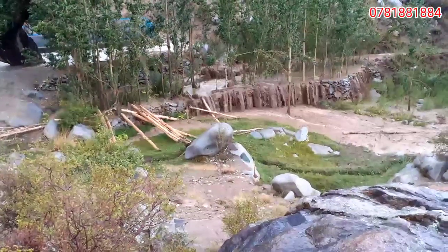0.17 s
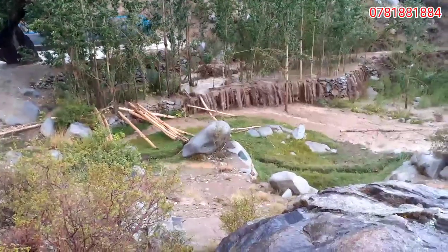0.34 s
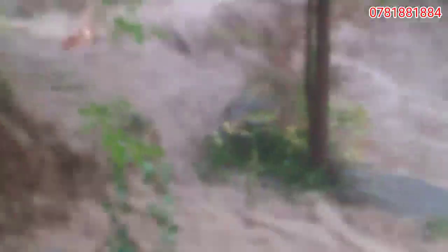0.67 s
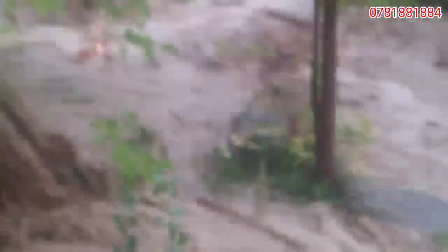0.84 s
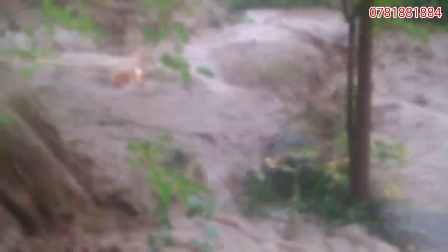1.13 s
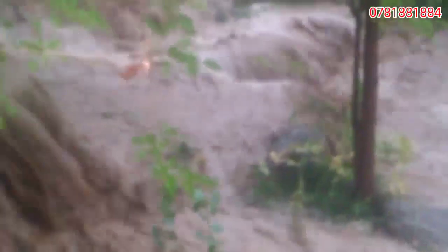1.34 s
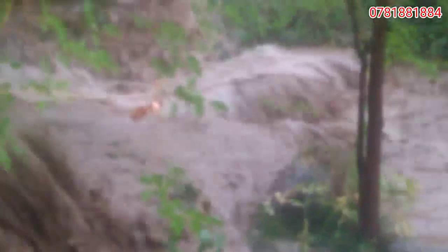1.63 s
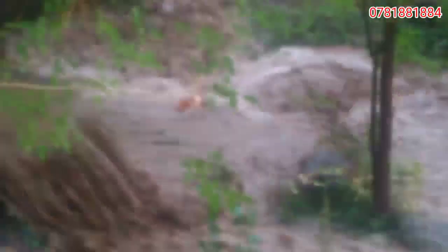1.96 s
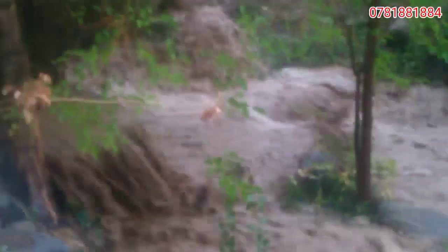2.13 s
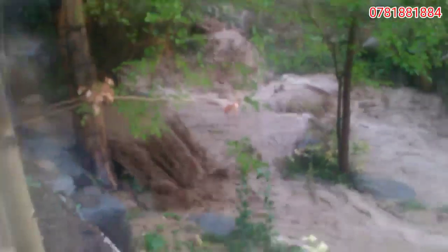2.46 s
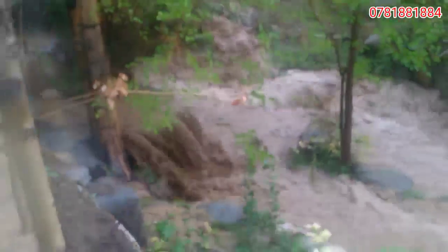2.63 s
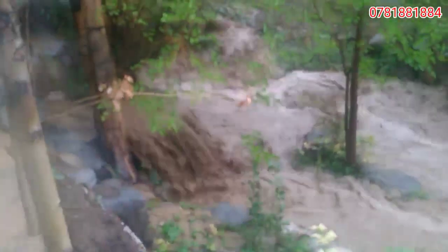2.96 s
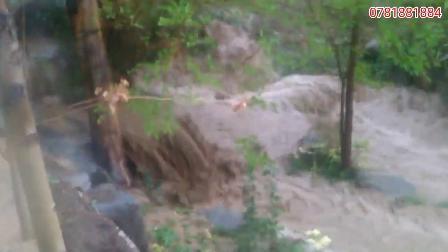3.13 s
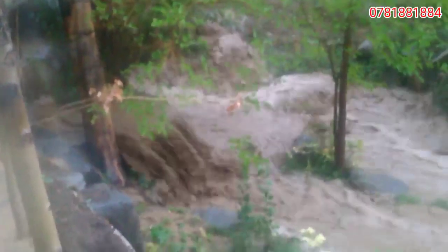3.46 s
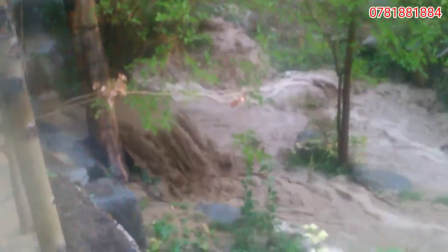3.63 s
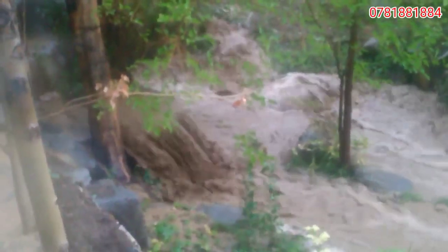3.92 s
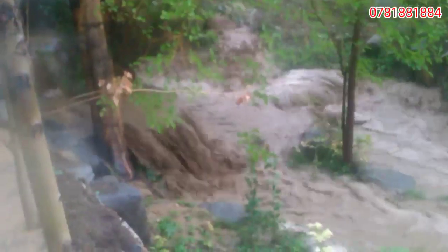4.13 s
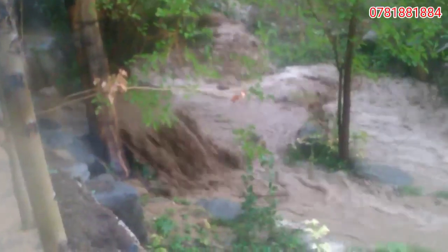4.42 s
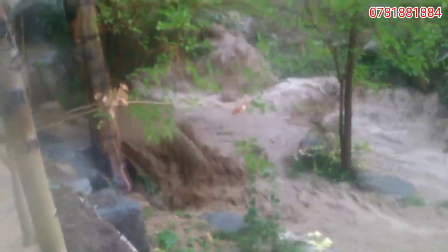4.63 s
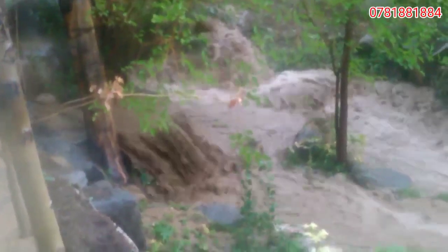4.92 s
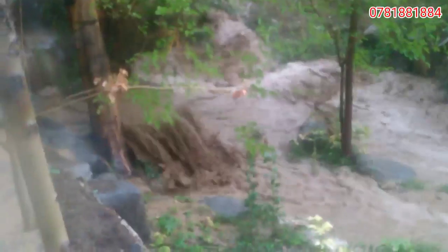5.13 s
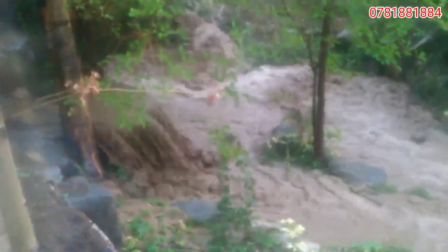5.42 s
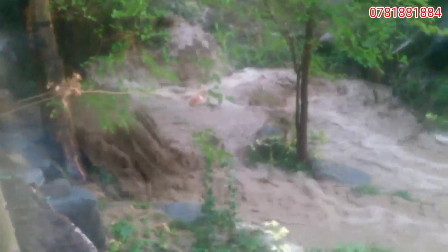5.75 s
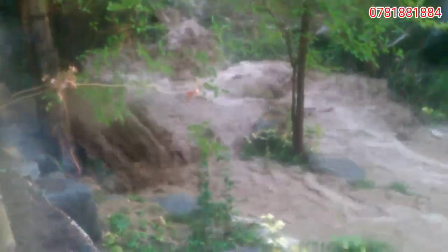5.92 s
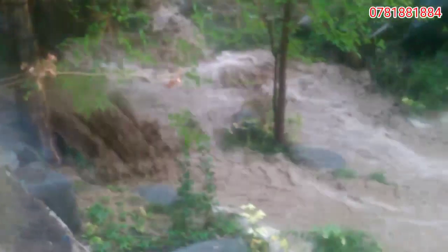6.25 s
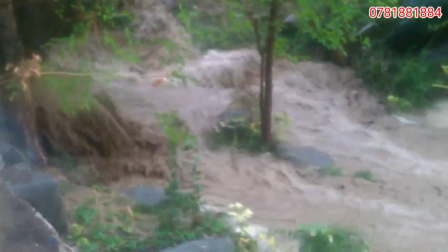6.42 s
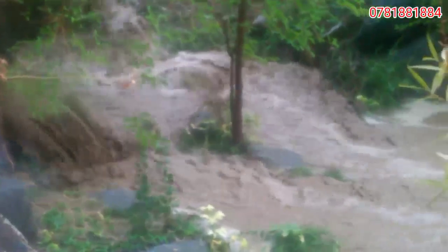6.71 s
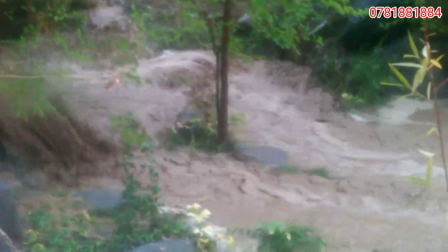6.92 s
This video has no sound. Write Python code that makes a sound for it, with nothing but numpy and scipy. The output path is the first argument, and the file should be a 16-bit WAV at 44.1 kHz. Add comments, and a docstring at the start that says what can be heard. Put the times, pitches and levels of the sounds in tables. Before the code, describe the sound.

Outdoors, a brief, distant rush of floodwater spreads wide in stereo, dotted with hard stony knocks, then cuts to silence. A single microphone on the stream bank picks up a loud, dense roar of water and a high hiss of spray. About a second later the roar falls away, leaving water churning and splashing over boulders with a low, uneven rumble and occasional gulps of air. The hiss thins near the end.

```python
"""Muddy floodwater after heavy rain

From a hillside, in wide stereo: a distant rush and a few sharp knocks, likely stones carried by the flood.
Half a second of silence, then one microphone close on the bank: countless splashes merge into a loud,
even roar under a bright hiss of spray. The roar falls away to leave waves tumbling over boulders,
with a deep rumble and lumpy churning. Pockets of trapped air ring as gurgles."""
import sys
import numpy as np
from scipy import signal
from scipy.fft import rfft, irfft
from scipy.io import wavfile

SR = 44100
rng = np.random.default_rng(int(sys.argv[2]) if len(sys.argv) > 2 else 0)


def output_pcm(signal):
    """Save a mono or channel-first signal as 16-bit PCM at the path in sys.argv[1].

    Samples are clipped to [-1, 1] before scaling.
    """
    pcm = np.clip(np.atleast_2d(signal).T, -1, 1) * 32767
    wavfile.write(sys.argv[1], SR, np.round(pcm).astype(np.int16))


N = 312228
TIME = np.arange(N) / SR
FREQ = np.maximum(np.arange(N // 2 + 1) * SR / N, 1)
HILLSIDE_END_S, BANK_START_S = .498, 1.076

# spectrum of the flood from the hillside (frequency [Hz], relative level [dB])
RUSH_SPECTRUM = [(18, -75), (30, -31), (108, -6.5), (152, -8.5), (202, -10.5), (332, -7.5), (378, -7.5),
                 (466, -13), (746, -11.5), (807, -13), (2070, -21.5), (3310, -21.5), (6870, -24),
                 (8700, -26.5), (15400, -30.5)]
# how alike the rush is at the left and right microphones (frequency [Hz], coherence [0-1])
RUSH_COHERENCE = [(60, .9), (290, 1), (640, .7), (1400, .17), (3100, .02)]
# distant stones (time [s], level [dB], pitch [Hz], left lag behind right [ms], tick re knock [dB])
KNOCKS = [(.0160, -12, 1300, 0, -11), (0.03, -14, 790, 0, -29.5), (0.066, -3, 720, 0, -21),
          (0.0835, -4.5, 1200, 0.11, -8), (0.0964, -19.5, 1100, 0, -20), (.1292, -16, 950, 0.022, -16),
          (0.1554, -5.5, 760, .14, -21.5), (.1572, -3.5, 900, 0.29, -19.5), (0.184, -5, 720, -.14, -26.5),
          (0.335, -9, 950, 0, -18), (0.4154, -16, 1300, 0, -6), (0.4692, -10.5, 950, 0, -15.5)]
# spectra of the main chute and its spray, from the bank (frequency [Hz], relative level [dB])
ROAR_SPECTRUM = [(15, -34), (25, -2.5), (76, 1), (124, -3), (204, -1.5), (359, -7.5), (454, -11), (728, -7),
                 (839, -6.5), (1110, -13.5), (1620, -9.5), (2370, -10), (3070, -16.5), (4800, -15.5),
                 (7000, -19.5), (9100, -45), (15400, -120)]
SPRAY_SPECTRUM = [(4800, -27), (5800, -9), (7000, -4.5), (8000, 1), (9000, 2), (10300, 2.5), (12000, 1),
                  (14300, -1)]
# the loudest gulps of air (time [s], pitch [Hz], peak level [dB])
LOUD_GURGLES = [(1.335, 860, -20), (3.794, 687, -27), (4.446, 697, -23.5), (4.708, 669, -22),
                (4.777, 562, -25), (5.005, 288, -19.5), (5.029, 777, -22), (5.215, 242, -18),
                (5.539, 684, -21.5), (5.928, 192, -19), (6.334, 713, -21.5), (7.009, 245, -19.5)]
# strength of the flow, which drives churn, splash and small gurgles (time [s], level [dB])
FLOW = [(2.7, -32), (4.1, -31), (4.37, -31), (4.42, -27.5), (5.15, -27), (7.05, -28)]
# rise and fall of the deep rumble (time [s], level [dB])
RUMBLE_LEVEL = [(3.3, -28.5), (3.7, -34.5), (4.35, -31), (4.45, -28), (5.15, -28), (5.55, -32),
                (5.88, -22.5), (6.15, -30), (6.65, -31.5), (7.0, -27.5)]
# spectra of the waves in the channel, from the bank (frequency [Hz], relative level [dB])
RUMBLE_SPECTRUM = [(8.8, -28), (15, 1), (38, -3.5), (70, 0), (150, -2.5), (200, -14.5), (330, -120)]
CHURN_SPECTRUM = [(88, -27), (150, 0.5), (247, 1), (297, -3.5), (360, -4.5), (458, -10), (695, -4.5),
                  (871, -5.5), (1100, -7.5), (1430, -46), (2420, -120)]
SPLASH_SPECTRUM = [(650, -18), (1100, -2), (2010, -0.5), (2310, -5), (2790, -4), (3180, -8.5), (4980, -9),
                   (7000, -5.5), (9100, -37), (15400, -120)]


def undb(db):
    """Decibels to gain."""
    return 10 ** (np.asarray(db) / 20)


def unit(x):
    """Scale to rms 1."""
    return x / np.sqrt(np.mean(x ** 2))


def add(out, s, sound):
    """Mix a sound in at time s."""
    start = int(s * SR)
    out[start:start + len(sound)] += sound[:max(len(out) - start, 0)]


def over_time(points):
    """Join (time [s], value) points by straight lines."""
    return np.interp(TIME, *np.transpose(points))


def over_freq(points):
    """Join (frequency [Hz], value) points on a log-frequency axis."""
    hz, value = np.transpose(points)
    return np.interp(np.log(FREQ), np.log(hz), value)


def colour(x, spectrum):
    """Filter by (frequency [Hz], level [dB]) points; rms 1."""
    return unit(irfft(rfft(x) * undb(over_freq(spectrum)), N))


def band(x, lo_hz, hi_hz, order=12):
    """Keep the band between two edges; rms 1."""
    power_loss = (1 + (lo_hz / FREQ) ** (2 * order)) * (1 + (FREQ / hi_hz) ** (2 * order))
    return unit(irfft(rfft(x) / np.sqrt(power_loss), N))


def wander(rate):
    """A random drift of rms 1 that takes `rate` new values a second."""
    knots = rng.standard_normal(size=2048)
    return unit(np.interp(TIME * rate, np.arange(len(knots)), knots))


def far_rush(gain_db=-27.5):
    """The flood from far off: bass alike at both microphones and leaning left, treble unrelated."""
    coherence = np.clip(over_freq(RUSH_COHERENCE), 0, .99)
    mid, side = (rfft(colour(rng.standard_normal(N), RUSH_SPECTRUM)) for _ in range(2))
    side *= np.sqrt((1 - coherence) / (1 + coherence))
    lean = undb(over_freq([(150, 1.4), (1300, 0.16)]))
    return irfft(np.array([(mid + side) * lean, (mid - side) / lean]), N) * undb(gain_db)


def stone_pulse(age, hz, ring_cycles=0.62, front_s=.0001):
    """A struck stone's surface moves and comes to rest; the air pressure follows its speed."""
    onset = 1 - np.exp(-age / front_s)
    return np.gradient(onset * np.sin(2 * np.pi * hz * age) * np.exp(-age * hz / ring_cycles))


def knocks(tick_s=.0013, echo_s=.0021, echo_db=-15, scatter_db=-23, scatter_s=.008):
    """Distant stones: each a steep pulse with a hard tick, a ground echo and scatter off the rocks."""
    out = np.zeros((2, N))
    age = np.arange(SR // 20) / SR
    scatter_band = signal.butter(2, [500, 2200], "band", fs=SR, output="sos")
    for s, db, hz, left_lag_ms, tick_db in KNOCKS:
        direct = stone_pulse(age, hz)
        echo = stone_pulse(np.maximum(age - echo_s, 0), hz)
        pulse = (direct + undb(echo_db) * echo) / direct.max()
        for mic, lag_ms in zip(out, (left_lag_ms, -left_lag_ms)):
            noise = rng.standard_normal(len(age))
            tick = undb(tick_db) * noise * np.exp(-age / tick_s)
            scatter = unit(signal.sosfilt(scatter_band, noise)) * np.exp(-age / scatter_s)
            add(mic, s + max(lag_ms, 0) / 1000, undb(db) * (pulse + tick + undb(scatter_db) * scatter))
    return out


def eddies(lo_hz, hi_hz, flicker_db, rate, bands):
    """White noise whose bands each flicker alone, as eddies of every size form and collapse."""
    position = np.clip(np.log(FREQ / lo_hz) / np.log(hi_hz / lo_hz), 0, 1)
    index = np.round(position * (bands - 1))
    noise = rfft(rng.standard_normal(N))
    strips = (irfft(noise * (index == k), N) for k in range(bands))
    return unit(sum(strip * undb(flicker_db * wander(rate)) for strip in strips))


def roar(level_db=-16.8):
    """The main chute, close up: so many splashes at once that they merge into an even roar."""
    water = colour(eddies(100, 6000, flicker_db=1.02, rate=20, bands=10), ROAR_SPECTRUM)
    return band(water, 17, 6800) * undb(level_db)


def spray(full_db=-24, thin_db=-34, thins_at_s=5.36, thinning_s=0.24, flutter_db=0.96):
    """Fine droplets and bursting foam hiss above the water; the hiss flutters once it thins."""
    thinness = 1 - np.exp(-np.maximum(TIME - thins_at_s, 0) / thinning_s)
    level_db = full_db + thinness * (thin_db - full_db + flutter_db * wander(rate=24))
    hiss = colour(eddies(6250, 12900, flicker_db=0.72, rate=29, bands=5), SPRAY_SPECTRUM)
    return band(hiss, 5490, 18600) * undb(level_db)


def bubble(hz, cycles, glide):
    """Trapped air swells and rings for some cycles, rising in pitch as it nears the surface."""
    ring_s = cycles / hz
    age = np.arange(int(ring_s * SR)) / SR / ring_s
    swell = age * np.exp(-6 * age) * (1 - age)
    return np.sin(2 * np.pi * cycles * age * (1 + glide * age / 2)) * swell / swell.max()


def small_gurgles(lo_hz=520, hi_hz=2400, over_flow_db=-3.0, db_per_octave=-1.0, count=20):
    """Random gulps (time [s], pitch [Hz], peak level [dB]): louder in strong flow, weaker when high."""
    when, size = rng.random((count, 2)).T
    s = BANK_START_S + when * (TIME[-1] - BANK_START_S)
    hz = lo_hz * (hi_hz / lo_hz) ** size
    flow_db = np.interp(s, TIME, over_time(FLOW))
    return list(zip(s, hz, flow_db + over_flow_db + db_per_octave * np.log2(hz / lo_hz)))


def gurgles(ring_s=0.079, glide=0.034, shake_cycles=0.32):
    """Large pockets of air gulp in the waves; the current shakes their pitch into a blur."""
    out = np.zeros(N)
    for s, hz, db in LOUD_GURGLES + small_gurgles():
        ring = bubble(hz, hz * ring_s, glide)
        samples = np.arange(len(ring))
        shake = shake_cycles * wander(rate=103.6)[:len(ring)] * SR / hz
        add(out, s, np.interp(samples + shake, samples, ring) * undb(db))
    return out


def rumble():
    """The deep, lumpy sound of waves tumbling over boulders."""
    water = colour(eddies(24, 140, flicker_db=2.5, rate=18, bands=3), RUMBLE_SPECTRUM)
    return band(water, 12, 206, order=6) * undb(over_time(RUMBLE_LEVEL))


def bubble_cloud(lo_hz, hi_hz, cycles, spread_db, count):
    """Bubbles of random size, life and strength; rms 1."""
    out = np.zeros(N)
    for when, size, life, force in rng.random((count, 4)):
        hz = lo_hz * (hi_hz / lo_hz) ** size
        ring = bubble(hz, cycles * (.5 + life), glide=0.092)
        add(out, when * N / SR, ring * hz * undb(spread_db * force))
    return unit(out)


def churn(flow_db, surge, surge_db=0.76):
    """Eddies and glugging bubbles fill the midrange, following the flow."""
    glugs = undb(-15.5) * bubble_cloud(158, 1080, cycles=12.8, spread_db=6.5, count=1500)
    water = eddies(160, 1050, flicker_db=1.5, rate=26, bands=12)
    return band(colour(water + glugs, CHURN_SPECTRUM), 160, 1037) * undb(flow_db + surge_db * surge)


def splash(flow_db, surge, weakest_db=-34.3, db_per_flow_db=0.68, surge_db=0.44):
    """Small splashes fizz with tiny bubbles, louder as the flow grows."""
    fizz = undb(-14.5) * bubble_cloud(1097, 3200, cycles=27, spread_db=25, count=2500)
    water = eddies(1150, 6500, flicker_db=1.8, rate=28, bands=18)
    level_db = weakest_db + db_per_flow_db * (flow_db - flow_db.min()) + surge_db * surge
    return band(colour(water + fizz, SPLASH_SPECTRUM), 1100, 5900) * undb(level_db)


def channel():
    """The boulder bed beside the microphone: each tumbling wave lifts churn and splash together."""
    flow_db = over_time(FLOW)
    surge = wander(rate=16)
    return rumble() + churn(flow_db, surge) + splash(flow_db, surge)


def scene(swell_from_db=-13, swell_s=0.21, roar_holds_to_s=2.36, fall_db_per_s=60, bank_top_hz=14300):
    """The hillside in stereo, a silence, then the bank in mono, where the roar yields to the channel."""
    swell = undb(swell_from_db * np.clip(1 - (TIME - BANK_START_S) / swell_s, 0, 1))
    roar_gain = undb(-fall_db_per_s * np.maximum(TIME - roar_holds_to_s, 0))
    channel_gain = np.sqrt(1 - roar_gain ** 2)
    bank = swell * (roar_gain * roar() + channel_gain * channel() + gurgles() + spray())
    bank = signal.sosfilt(signal.ellip(12, .2, 70, bank_top_hz, fs=SR, output="sos"), bank)
    hillside = far_rush() + knocks()
    return hillside * (TIME < HILLSIDE_END_S) + bank * (TIME > BANK_START_S)


def record(dry):
    """The recorder cuts the treble above 15.6 kHz."""
    return signal.sosfilt(signal.ellip(10, .2, 80, 15600, fs=SR, output="sos"), dry)


dry = scene()
out = record(dry)
output_pcm(out)
```